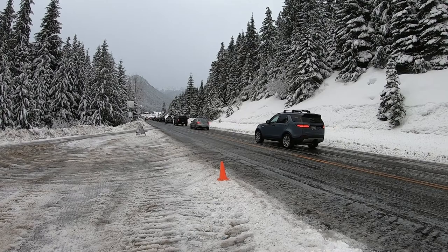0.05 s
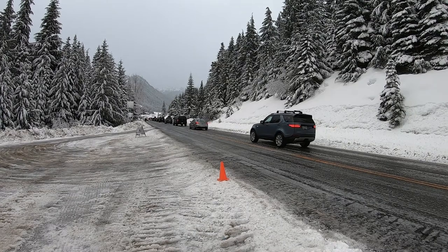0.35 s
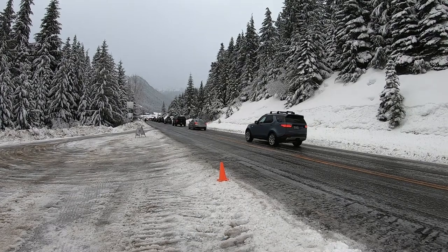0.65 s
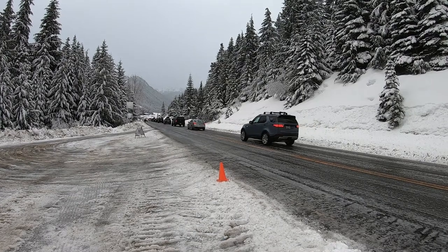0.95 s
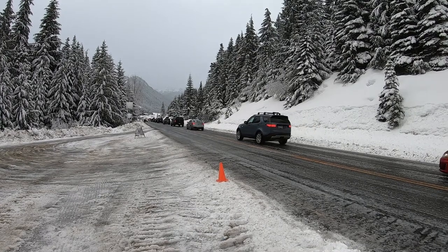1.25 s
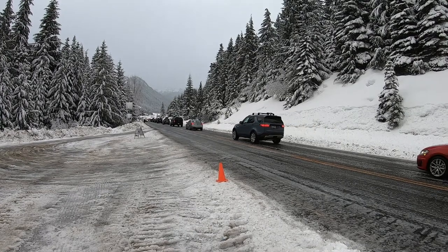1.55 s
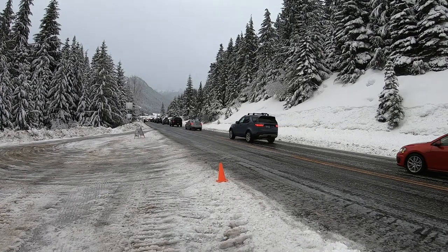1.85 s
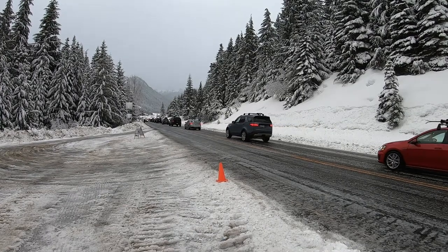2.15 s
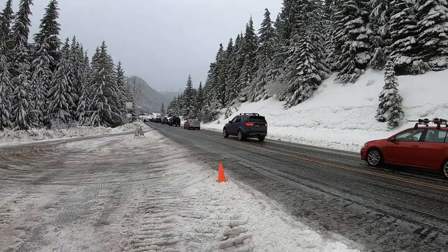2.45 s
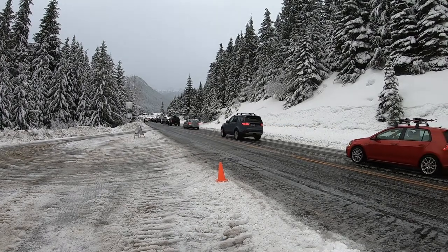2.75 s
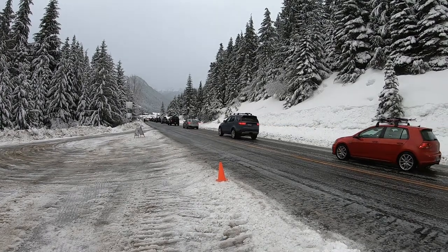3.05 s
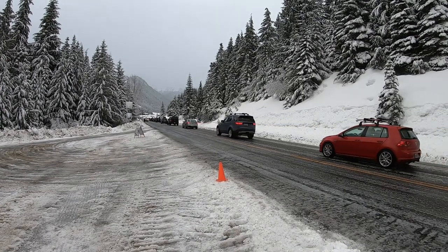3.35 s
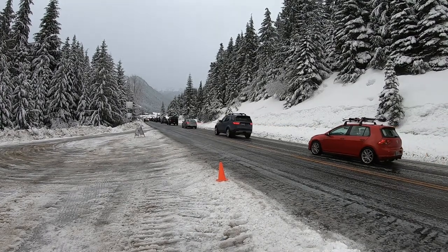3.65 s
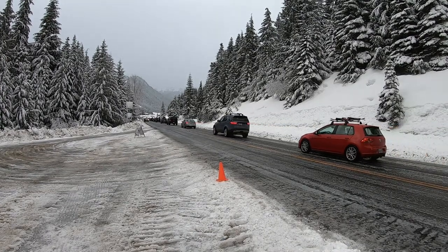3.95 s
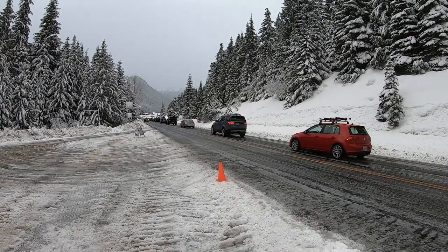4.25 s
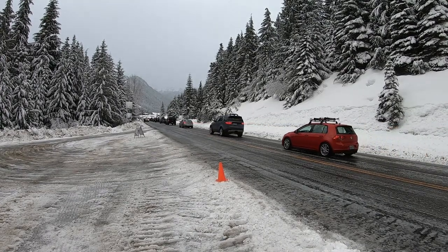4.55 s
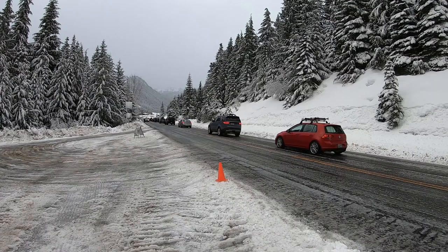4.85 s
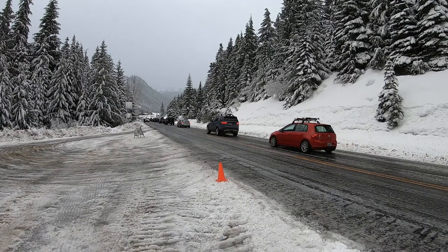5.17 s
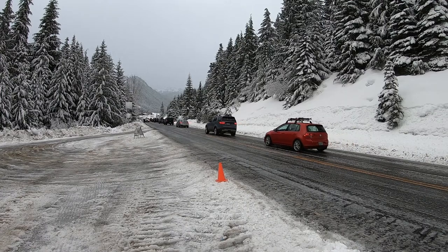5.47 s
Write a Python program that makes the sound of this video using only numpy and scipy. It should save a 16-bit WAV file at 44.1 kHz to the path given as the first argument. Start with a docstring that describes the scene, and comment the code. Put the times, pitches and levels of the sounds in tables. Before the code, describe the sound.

Slow traffic rolls by through slush with a low engine hum, soft wet tyre hiss and small snaps of stones and ice.

```python
"""A line of cars creeps past on a wet, slushy mountain road, to the listener's right.
Their engines drone on low notes set by how fast they fire. The tyres rumble, roar softly
and hiss in the film of water, all made of shaped noise. Tiny, fast-dying rings make the
snap of stones, the crackle of grit and the tick of ice. Now and then a wheel thumps over
packed snow or squirts out slush, each a soft burst of noise."""
import sys
import numpy as np
from scipy import signal
from scipy.fft import rfft, irfft, next_fast_len
from scipy.io import wavfile
from scipy.ndimage import uniform_filter1d, map_coordinates

SR = 44100
rng = np.random.default_rng(int(sys.argv[2]) if len(sys.argv) > 2 else 0)


def wav_out(sig):
    """Save sig, one row per channel (or a flat mono array), as 16-bit PCM at SR to the path in sys.argv[1]."""
    wavfile.write(sys.argv[1], SR, np.round(np.clip(np.atleast_2d(sig).T, -1, 1) * 32767).astype(np.int16))


N = 243129
TIME = np.arange(N) / SR  # seconds

# Wheels ploughing through deeper slush.
# Each row: time in seconds, rise of the drone in dB, rise of the spray in dB.
PUDDLES = [(.52, 0, 2.5), (1.33, 3, 0.5), (3.5, 0.5, 1), (5.55, 2.5, 3)]
PUDDLE_HALF_S = 0.3  # half the length of each rise


def amp(db):
    """Turn decibels into a gain to multiply by."""
    return 10 ** (np.asarray(db) / 20)


def unit(x):
    """Scale a sound so that the average of its channels has a strength (rms) of 1."""
    return x / np.sqrt(np.mean(np.atleast_2d(x).mean(0) ** 2) + 1e-20)


def along(points, hz):
    """Read between (Hz, value) points, with pitch on a log scale."""
    point_hz, values = np.transpose(points)
    return np.interp(np.log(hz + 1), np.log(point_hz + 1), values)


def curves(rows):
    """Turn each column after the time into one value per sample."""
    times, *columns = np.transpose(rows)
    return [np.interp(TIME, times, column) for column in columns]


def bell(middle_s, half_s):
    """A smooth hill that rises to 1 and falls back."""
    return np.exp(-((TIME - middle_s) / half_s) ** 2)


def wobble(rate):
    """A smooth random curve through `rate` new values a second."""
    values = rng.standard_normal(int(N * rate / SR) + 4)
    return map_coordinates(values, [TIME * rate])


def filtered(x, response):
    """Turn each frequency up or down by the gain that `response` gives it."""
    size = next_fast_len(N + SR // 2)
    return irfft(rfft(x, size) * response(np.fft.rfftfreq(size, 1 / SR)), size)[..., :N]


def noise(patchy_db):
    """Two unrelated noises with louder and softer patches across pitch and time."""
    spectrum = signal.stft(rng.standard_normal((2, N)), nperseg=512)[2]
    patches = uniform_filter1d(rng.standard_normal(spectrum.shape[1:]), size=8, axis=0)
    patches = uniform_filter1d(patches, size=12, axis=1)
    spectrum *= amp(patchy_db * patches / patches.std())
    return unit(signal.istft(spectrum, nperseg=512)[1][:, :N])


def wide_on_right(pair, spectrum):
    """Shape two unrelated signals and blend them into one wide sound on the right, at rms 1."""
    # How alike the two sides are. Each row: frequency in Hz, likeness (1 same, -1 opposite).
    likeness = [(120, .993), (300, .96), (450, .87), (750, .45), (1050, .05), (1400, .33), (2700, .42),
                (3400, .22), (4300, .58), (5200, 0), (6400, -.57), (10000, -.5), (13000, -.1)]
    # The lean to the right. Each row: frequency in Hz, left level minus right level in dB.
    lean = [(60, -0.5), (180, -1), (310, 0), (550, -2.5), (950, -10.5), (1640, -6.5), (2300, -5),
            (2850, -4.5), (4000, -7), (5200, -2.5), (7300, -7.5), (10000, -3)]

    def blend(hz):
        alike = np.clip(along(likeness, hz), -.9, .999)
        turn, left = np.arccos(alike) / 2, amp(along(lean, hz))
        common, opposed = np.cos(turn), np.sin(turn)
        gain = amp(along(spectrum, hz)) / np.sqrt(1 + left ** 2 + 2 * alike * left)
        return gain * np.array([[left * common, left * opposed], [common, -opposed]])
    return unit(filtered(pair, blend).sum(1))


def from_road(x, shade_db):
    """Sound from one spot on the road reaches the left side later and softer."""
    pair = np.array([amp(shade_db) * np.roll(x, 3), x])
    return pair * 2 / (1 + amp(shade_db))


def hum(hz, tones, rough):
    """Slightly unsteady tones at multiples of a pulse rate, which may be fixed or changing."""
    phase = 2 * np.pi * np.cumsum(np.broadcast_to(hz, N)) / SR
    sound = np.zeros(N)
    for multiple, db in tones:
        gain = amp(db) * (1 + rough * wobble(13))
        sound += gain * np.sin(multiple * phase + rough * wobble(8.2) + 2 * np.pi * rng.random())
    return sound


def pings(start_s, peak, hz, cycles, swell=2):
    """Tiny impacts: each swells quickly, then fades to about a third every `cycles` vibrations."""
    age = hz[:, None] * np.arange(SR // 100) / SR  # counted in vibrations
    rings = np.exp(-age / cycles) * (1 - np.exp(-swell * age)) * np.sin(2 * np.pi * age)
    rings *= peak[:, None] / np.abs(rings).max(1, keepdims=True)
    index = np.round(start_s * SR).astype(int)[:, None] + np.arange(SR // 100)
    return np.bincount(index.ravel(), rings.ravel(), N)[:N]


def grains(per_s, centre_hz, spread, cycles, scatter_db):
    """Two streams of tiny impacts, random in time, pitch and size."""
    def stream():
        when, pitch, size = rng.random((int(per_s * N / SR), 3)).T
        hz = centre_hz * np.exp(spread * (2 * pitch - 1))
        peak = amp(-scatter_db * np.log(size + .02))
        return pings(when * N / SR, peak, hz, cycles)
    return unit(np.array([stream(), stream()]))


def bursts(rows):
    """Soft bursts of noise, each gathered round its own pitch."""
    sound = np.zeros((2, N))
    for middle_s, half_s, db, centre_hz, width in rows:
        white = rng.standard_normal((2, N))
        band = filtered(white, lambda hz: 1 / (1 + ((hz / centre_hz - 1) / width) ** 2))
        sound += amp(db) * bell(middle_s, half_s) * wide_on_right(band, [(centre_hz, 0)])
    return sound


def lead_car():
    """The first engine fires slower as it eases off, then picks up again."""
    # Each row: time in seconds, firing rate in Hz, level in dB.
    revs = [(0, 51.7, -24.5), (.35, 53.64, -22), (.6, 54.2, -20.5), (.8, 53.06, -23), (1.2, 49.1, -26.5),
            (1.5, 47.8, -35.5), (2.1, 43.24, -32), (2.5, 36.97, -33), (3.4, 36.1, -33), (4.4, 39.08, -31.5),
            (4.8, 41.55, -25), (5.05, 39.9, -32), (5.51, 37.4, -29.5)]
    # The engine's tones. Each row: multiple of the firing rate, dB added to the level.
    tones = [(.5, -19), (1, 1), (1.5, -13), (2, -15.5), (3, -25), (4, -29)]
    hz, db = curves(revs)
    return amp(db) * hum(hz, tones, rough=0.063)


def middle_car():
    """The second engine holds its revs, so its note stays put while it swells and fades."""
    # Each row: time in seconds, level in dB.
    levels = [(0, -41), (1.1, -38), (1.3, -32.5), (1.45, -42), (1.8, -41), (1.97, -29), (2.48, -27),
              (2.62, -36), (2.9, -31), (3.25, -28.5), (3.45, -40), (5.51, -47)]
    # The engine's tones. Each row: multiple of the firing rate, dB added to the level.
    tones = [(.5, -12), (1, 1), (2, -17), (3, -24.5), (4, -25.5)]
    db, = curves(levels)
    return amp(db) * hum(hz=67.78, tones=tones, rough=0.17)


def idling_car():
    """A waiting car ticks over on a steady note."""
    # The engine's tones. Each row: multiple of the firing rate, relative level in dB.
    tones = [(1, 0.5), (2, -3), (3, -4), (4, -14)]
    return amp(-35) * hum(hz=33.85, tones=tones, rough=0.32)


def tyre_rumble():
    """Rolling wheels rumble in uneven lumps, louder as they go through ruts."""
    # The rumble's tone. Each row: frequency in Hz, relative level in dB.
    spectrum = [(15, -25), (25, -9), (35, -3.5), (55, -2), (80, -4.5), (108, -5), (130, -14), (200, -26.5),
                (400, -64), (1500, -120)]
    # Each row: time of a rut in seconds, rise in dB, half length in seconds.
    ruts = [(.45, 2.5, 0.16), (2.15, 3, 0.11), (2.48, 5, 0.037), (3.2, 4.5, 0.087), (3.473, 4.5, .07),
            (3.716, 8.5, 0.05), (4.02, 6.5, 0.11), (5.2, 9, 0.083), (5.424, 6.5, .12)]
    rut_db = sum(db * bell(s, half_s) for s, db, half_s in ruts)
    flutter_db = 3 * wobble(rate=11)
    return amp(-33.5 + rut_db + flutter_db) * wide_on_right(noise(patchy_db=0), spectrum)


def tyre_drone():
    """The rolling cars give a low drone that grows in deeper slush."""
    # The drone's tone. Each row: frequency in Hz, relative level in dB.
    spectrum = [(70, -22), (120, -3), (165, -2.5), (210, -7), (300, -11), (420, -16.5), (600, -25),
                (1200, -76), (4000, -120)]
    puddle_db = sum(db * bell(s, PUDDLE_HALF_S) for s, db, _ in PUDDLES)
    return amp(-41.5 + puddle_db) * wide_on_right(noise(patchy_db=0.5), spectrum)


def tyre_roar(churn, clumps, spray_db):
    """Treads roar and crunch over grit, fading slowly as the nearest cars draw away."""
    # The roar's tone. Each row: frequency in Hz, relative level in dB.
    spectrum = [(200, -13), (420, -2), (700, 1.25), (900, -0.5), (1100, -3), (1400, -1.5), (1700, -3),
                (2200, -8.5), (2800, -9), (3400, -14.5), (4300, -21), (6000, -38), (12000, -100)]
    grit = clumps * grains(per_s=400, centre_hz=2277, spread=0.56, cycles=0.72, scatter_db=4.5)
    db = -43.5 - 0.26 * TIME + 0.28 * spray_db + 0.2 * churn
    return amp(db) * wide_on_right(noise(patchy_db=1) + 0.22 * grit, spectrum)


def spray_hiss(churn, clumps, spray_db):
    """The film of water hisses and fizzes with drops, fading as the cars draw away."""
    # The hiss's tone. Each row: frequency in Hz, relative level in dB.
    spectrum = [(1500, -7), (3000, -1.5), (4200, 3), (5200, -2), (6300, 0), (7300, 2.5), (7800, 0),
                (8200, -3.5), (9300, -11), (10500, -15), (12500, -22.5), (15000, -32)]
    drops = clumps * grains(per_s=260, centre_hz=8000, spread=0.22, cycles=1.5, scatter_db=4.6)
    db = -58.5 - 0.2 * TIME + spray_db + 0.39 * churn
    return amp(db) * wide_on_right(noise(patchy_db=1.55) + 0.3 * drops, spectrum)


def stones():
    """Stones snap out from the treads with dull pops that echo off cars and snow banks."""
    # Each row: start in seconds, level in dB before boost and filter, ring in Hz, fade in vibrations.
    snaps = [(0.0760, -28.5, 1390, 0.54), (0.3706, -30, 1490, 1.1), (0.5838, -29, 1900, 1.4),
             (0.5858, -29.5, 1600, 0.76), (0.8024, -30.5, 1420, 0.8), (1.229, -29, 1850, 0.8),
             (1.3647, -24, 1300, 0.8), (1.5050, -22.5, 1398, 0.43), (1.8000, -27, 1659, 0.75),
             (1.9138, -22.5, 1450, 0.58), (2.0576, -24.5, 1850, 1.5), (2.1497, -31, 1320, 0.99),
             (2.3010, -30, 1790, 1.175), (2.555, -25, 1300, 0.99), (2.6978, -23.5, 1460, 0.75),
             (3.2048, -27.5, 1400, 1.6), (3.2090, -27, 1460, 0.81), (3.2465, -14.5, 1510, 1.18),
             (3.4, -25.5, 1210, 0.64), (3.586, -27.5, 1250, 1.1)]
    # A filter that dulls each pop, cutting steeply above 2 kHz. Each row: frequency in Hz, gain in dB.
    dulling = [(200, -13), (600, 2), (1000, -6), (1400, -5), (1800, -2.5), (1950, -5), (2200, -19),
               (3500, -26), (8000, -34)]
    start_s, db, hz, cycles = np.transpose(snaps)
    rings = pings(start_s, amp(db + 2), hz, cycles[:, None], swell=1)
    pops = filtered(rings, lambda f: amp(along(dulling, f)))
    tail = rng.standard_normal((2, SR // 8)) * amp(-60 * TIME[:SR // 8] / .045)  # 60 dB down in 45 ms
    echo = signal.fftconvolve(pops[None], tail / np.linalg.norm(tail[0]), axes=1)[:, :N]
    return from_road(pops + chips(start_s), shade_db=-24) + amp(-14) * echo


def chips(snap_s, count=3, within_s=.013, centre_hz=1490):
    """A few fragments rattle off just after each stone snaps."""
    delay, size, pitch = rng.random((len(snap_s) * count, 3)).T
    start_s = np.repeat(snap_s, count) + within_s * delay
    return pings(start_s, amp(-38 + size), centre_hz * 2 ** (pitch - .5), cycles=0.48)


def crunch():
    """Grit cracks piece by piece under the treads, and in a dense run over frozen crust."""
    # Each row: start in seconds, peak level in dB, ring in Hz.
    cracks = [(0.0761, -38.5, 3430), (0.158, -33, 2500), (0.349, -36, 3330), (0.4945, -34, 3180),
              (0.6388, -33.5, 4100), (0.839, -38, 2950), (1.0960, -37.5, 4670), (1.5049, -38, 3000),
              (1.6063, -36, 2840), (1.7994, -32.5, 2920), (1.8816, -36, 3300), (1.9147, -35, 3000),
              (2.0588, -37, 3600), (2.698, -36, 2590), (3.2054, -33.5, 3544), (4.439, -36, 3180),
              (4.6814, -36, 3330), (4.7856, -32, 2200)]
    start_s, db, hz = np.transpose(cracks)
    singles = pings(start_s, amp(db), hz, cycles=1.1, swell=0.95)
    crackle = grains(per_s=210, centre_hz=2840, spread=0.38, cycles=1.7, scatter_db=-1)[0]
    crust = amp(-59.5) * bell(middle_s=.45, half_s=.12) * unit(crackle)
    return from_road(singles + crust, shade_db=-20)


def ice_ticks():
    """Breaking ice and flung droplets make bright ticks."""
    # Each row: start in seconds, peak level in dB before the highest treble is softened, ring in Hz.
    ticks = [(0.1264, -44, 9900), (0.1270, -39, 10900), (0.1280, -43, 12900), (.6388, -48, 6900),
             (.7433, -39, 7200), (.8121, -33.5, 7050), (.8383, -40, 8200), (1.1612, -43, 7220),
             (1.1812, -41, 7550), (1.3650, -39, 7100), (1.4325, -40, 7400), (1.5054, -37, 7300),
             (1.5948, -36, 7250), (1.6861, -49, 10030), (1.6919, -43, 7380), (1.9284, -37, 7300),
             (2.0187, -41, 7400), (2.4806, -42, 7300), (2.6143, -43, 7400), (2.8502, -36, 7210),
             (3.072, -43, 8790), (3.6635, -43, 7300), (3.1404, -48, 10300), (3.8697, -39, 7110),
             (4.79, -53, 10930), (5.058, -55, 12300)]
    start_s, db, hz = np.transpose(ticks)
    rings = pings(start_s, amp(db), hz, cycles=2.6, swell=0.42)
    softened = filtered(rings, lambda f: 1 / (1 + (f / 13300) ** 12))
    return from_road(softened, shade_db=-11)


def snow_thumps():
    """Wheels thump over ridges and lumps of packed snow."""
    # Each row: middle and half length in seconds, level in dB, pitch in Hz, width as a share of it.
    thumps = [(.425, 0.027, -44.5, 800, .3), (1.25, 0.054, -49, 620, .3), (2.433, .005, -39.5, 800, .25),
              (3.443, 0.018, -36, 290, .36), (3.721, .005, -42, 850, .36)]
    return bursts(thumps)


def queueing_cars():
    """Low notes of other cars swell out of the drone, glide a little and sink back."""
    # Each row: middle and half length in seconds, level in dB, base pitch in Hz, glide in Hz a second.
    notes = [(.48, 0.12, -30, 102, -8), (1.35, 0.14, -34, 99.6, 5), (1.45, 0.35, -51, 268.7, 0),
             (2.22, 0.21, -35.5, 102.8, -1), (2.28, 0.26, -37.5, 133, 30), (3.38, 0.22, -32.5, 110, 28),
             (5.36, 0.18, -29, 106, 39.5), (5.47, .1, -42, 275.3, 3)]
    tone = [(0.98, 0.0098)]  # one tone, 2% below the base pitch
    sound = np.zeros(N)
    for middle_s, half_s, db, base_hz, glide in notes:
        hz = base_hz + glide * (TIME - middle_s)
        sound += amp(db) * bell(middle_s, half_s) * hum(hz, tone, rough=0.1)
    return sound


def slush_squirts():
    """Slush squirts from under a tyre with a short hiss."""
    # Each row: middle and half length in seconds, level in dB, pitch in Hz, width as a share of it.
    squirts = [(.55, 0.17, -59, 4830, .1), (1.92, 0.12, -57, 2600, .25), (2.65, 0.045, -54.5, 4620, .07),
               (3.34, 0.065, -63, 7900, .1), (3.86, 0.021, -63, 7300, .14), (4.46, 0.048, -63, 4395, .1),
               (4.68, 0.083, -53, 2600, .25), (4.68, .03, -61, 7400, .12), (4.74, 0.0072, -55.5, 4550, .2),
               (5.2, 0.3, -55, 2600, .25), (5.46, 0.071, -64.5, 7200, .1)]
    return bursts(squirts)


def following_car():
    """The third engine fires faster and grows louder as its car gathers speed."""
    # Each row: time in seconds, firing rate in Hz, level in dB.
    revs = [(2.2, 76.2, -57), (2.9, 82.9, -40), (3.5, 87.5, -33.5), (3.85, 88, -38), (4.2, 89.23, -33.5),
            (4.35, 89.5, -37), (4.55, 90.8, -30), (4.8, 90.3, -29), (5, 92.63, -39), (5.51, 95.8, -36)]
    # The engine's tones. Each row: multiple of the firing rate, dB added to the level.
    tones = [(1, 1.5), (2, -18), (3, -24)]
    hz, db = curves(revs)
    return amp(db) * hum(hz, tones, rough=0.18)


def tread_hum(enters_s=2.7, nearest_s=4.12):
    """The following car's tread hums higher as it speeds up, and is loudest when nearest."""
    # Each row: time in seconds, pitch in Hz.
    pitches = [(3, 142), (3.5, 151), (3.72, 161), (4.15, 162), (4.45, 173), (5, 177)]
    hz, = curves(pitches)
    fade_in = np.clip(TIME - enters_s, 0, 1)
    distance = np.hypot(1, (TIME - nearest_s) / 0.45)  # a straight path, 1 at its nearest
    return amp(-37.5) * fade_in / distance * hum(hz, [(1, 0)], rough=0.3)


def scene():
    """Everything on the road, heard from the verge."""
    slush = slush_squirts() + snow_thumps()
    engines = lead_car() + middle_car() + following_car() + queueing_cars() + idling_car()
    engines = engines * amp([[-.45], [.45]])  # long waves reach both sides almost alike
    churn = wobble(rate=22.02)  # uneven slush stirs grit and spray together
    clumps = amp(churn) * np.interp(TIME, [3.2, 4.3], [1, .65])  # grains blur as the cars draw away
    spray_db = sum(db * bell(s, PUDDLE_HALF_S) for s, _, db in PUDDLES)
    tyres = tyre_rumble() + tyre_drone() + tyre_roar(churn, clumps, spray_db)
    spray = spray_hiss(churn, clumps, spray_db)
    return engines + tyres + spray + tread_hum() + stones() + crunch() + ice_ticks() + slush


def record(dry):
    """Fade both ends briefly and cut off the very highest treble."""
    fade_s, top_hz = .004, 14900
    fade = np.minimum(np.minimum(TIME, TIME[::-1]) / fade_s, 1)
    return filtered(dry * fade, lambda hz: hz < top_hz)


dry = scene()
out = record(dry)
wav_out(out)
```